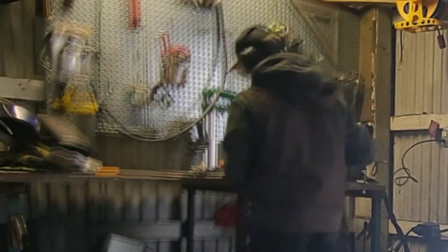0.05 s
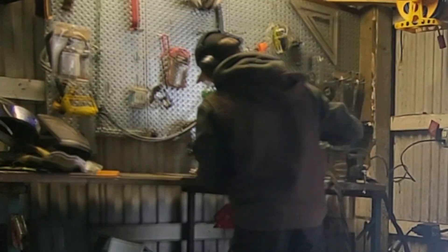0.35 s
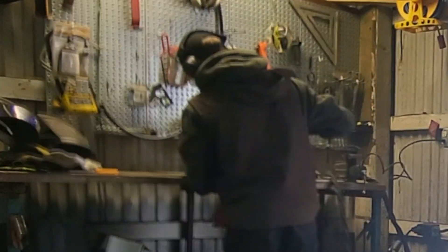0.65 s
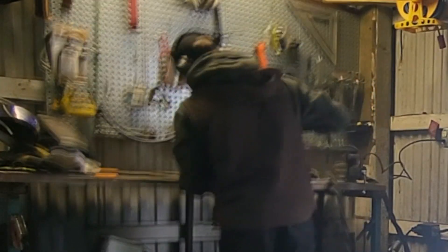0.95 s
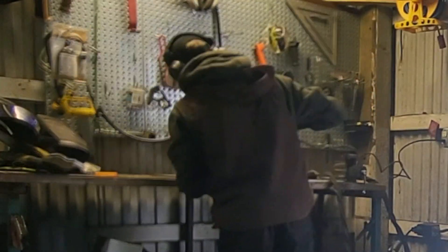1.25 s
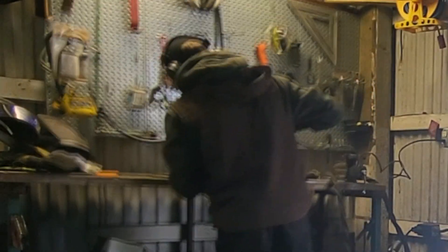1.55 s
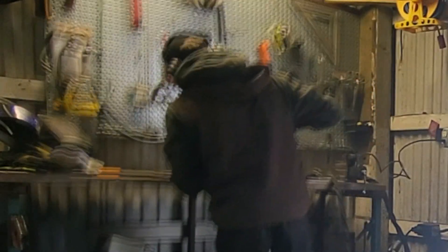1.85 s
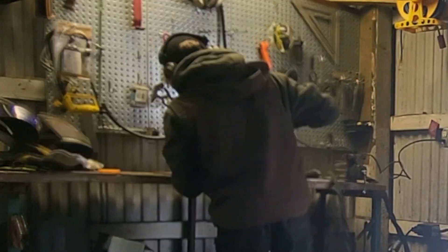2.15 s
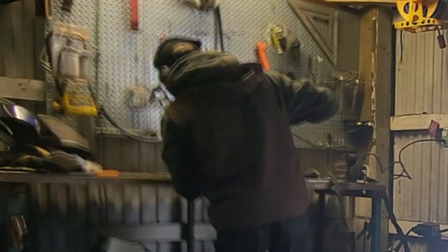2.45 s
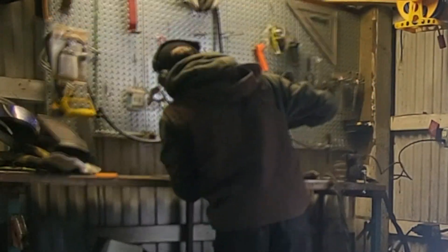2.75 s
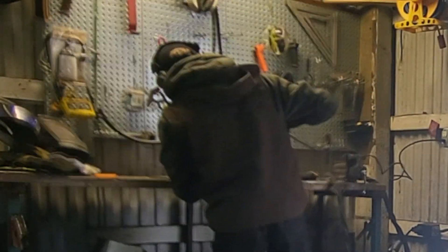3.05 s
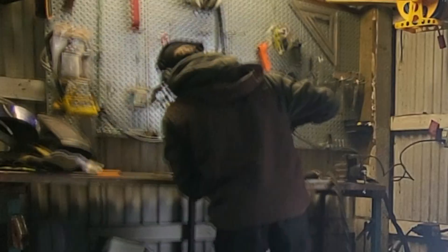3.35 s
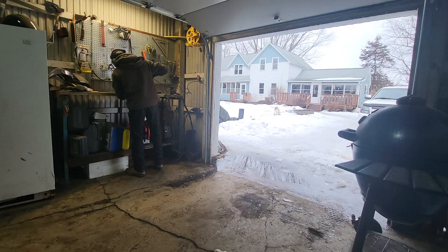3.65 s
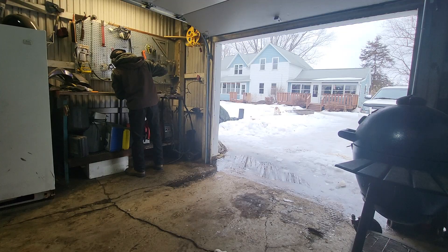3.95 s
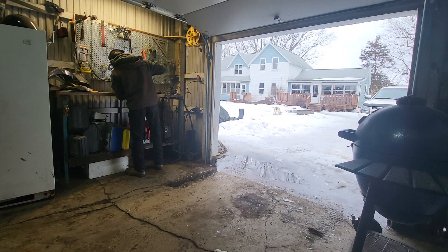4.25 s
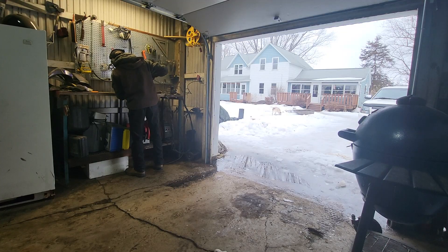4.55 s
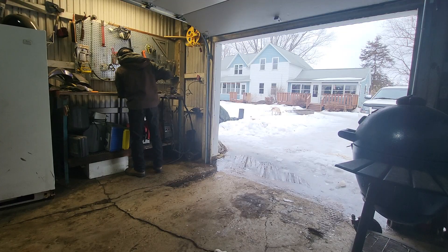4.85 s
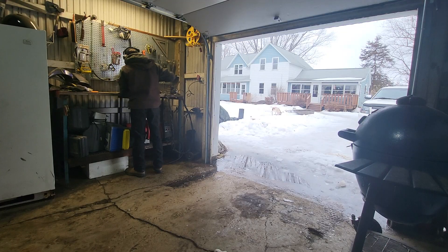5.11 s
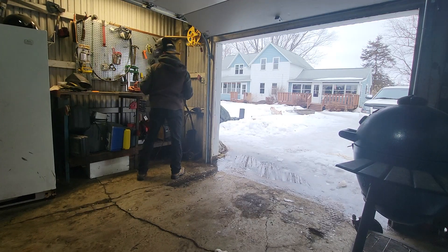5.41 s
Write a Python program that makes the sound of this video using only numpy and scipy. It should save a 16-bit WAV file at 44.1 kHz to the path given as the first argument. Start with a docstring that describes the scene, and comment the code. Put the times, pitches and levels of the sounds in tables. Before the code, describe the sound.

An electric angle grinder runs close by in a garage, its high whine riding on a strong hiss. The disc is pressed into steel in several short passes, each adding a gritty, ringing scrape, and on the harder ones the pitch sags and the disc squeals. Past the middle the grinder is heard from farther off, still working. It cuts off abruptly near the end, leaving very faint room noise.

```python
"""An electric angle grinder works on steel in a garage: its fan blades chop the air into a whine,
over a hiss of air and grit and the hum of unbalanced rotating parts. Under load the motor slows,
abrasion excites the modes of the steel, and the disc chatters into a squeal.
Part-way through it is heard from farther off; then it breaks off at once, leaving the quiet garage
and a faint scuff. Two soft low bumps lie underneath."""
import sys
import numpy as np
from scipy import signal
from scipy.fft import rfft, irfft, next_fast_len
from scipy.io import wavfile
from scipy.ndimage import map_coordinates

SR = 44100
rng = np.random.default_rng(int(sys.argv[2]) if len(sys.argv) > 2 else 0)


def int16_out(signal):
    """Quantize to a 16-bit WAV file."""
    q = np.round(np.clip(np.atleast_2d(signal).T, -1, 1) * 32767)
    wavfile.write(sys.argv[1], SR, q.astype(np.int16))


N = 245979
FAN_BLADES, GEAR = 12, 12 / 37  # GEAR: disc turns per rotor turn


def amp(db):
    """Amplitude ratio of a level in decibels."""
    return 10 ** (np.asarray(db) / 20)


def unit(x):
    """Normalisation to rms 1."""
    return x / np.sqrt(np.mean(x ** 2) + 1e-20)


def along(points, hz):
    """Interpolation of (frequency, value) points on a logarithmic frequency axis."""
    f, v = np.transpose(points)
    return np.interp(np.log(hz + 1), np.log(f + 1), v)


def curve(points):
    """Linear interpolation of (time, value) points at every sample."""
    return np.interp(np.arange(N) / SR, *np.transpose(points))


def wobble(rate):
    """Slow random modulation: a spline through rate Gaussian values a second."""
    knots = rng.standard_normal(int(N * rate / SR) + 4)
    return map_coordinates(knots, [np.arange(N) * rate / SR])


def swell(centre, length):
    """Half-cosine envelope."""
    return np.cos(np.pi * np.clip((np.arange(N) / SR - centre) / length, -.5, .5))


def strokes(rows, attack_s, release_s):
    """Sum of trapezoidal envelopes, one per (start, duration, level) row."""
    t = np.arange(N) / SR
    return sum(amp(db) * np.clip((t - s) / attack_s, 0, 1) * np.clip((s + length - t) / release_s, 0, 1)
               for s, length, db in rows)


def filtered(x, response):
    """Linear filtering: the spectrum is multiplied by a frequency response."""
    size = next_fast_len(N + SR // 2)
    return irfft(rfft(x, size) * response(np.fft.rfftfreq(size, 1 / SR)), size)[..., :N]


def coloured(x, spectrum):
    """Spectral shaping by (frequency, level) points, at rms 1."""
    return unit(filtered(x, lambda hz: amp(along(spectrum, hz))))


def ringing(x, modes):
    """Modal superposition at rms 1; each mode is two identical resonators in series."""
    def resonator(f, centre, width):
        return 1j * f * width / (centre ** 2 - f ** 2 + 1j * f * width)
    return unit(filtered(x, lambda f: sum(amp(db) * resonator(f, hz, bw) ** 2 for hz, bw, db in modes)))


def tone(cycles, rough, flutter):
    """Line broadening at rms 1: a share of the power, rough, fluctuates flutter times a second."""
    scatter = (wobble(flutter) + 1j * wobble(flutter)) * np.sqrt(rough / 2)
    carrier = np.exp(2j * np.pi * (cycles + rng.random()))
    return unit(np.real((np.sqrt(1 - rough) + scatter) * carrier))


def grit(spiky_db):
    """Countless tiny impacts merge into noise with a log-normal envelope."""
    return rng.standard_normal(N) * amp(spiky_db * wobble(1800))


def ambience():
    """The noise floor of the quiet garage: stationary noise, strongest at low frequencies."""
    # background spectrum: (frequency [Hz], relative level [dB])
    spectrum = [(30, -12.5), (130, -6), (190, 0.5), (320, -7.5), (850, -2), (1300, -1), (1800, -12),
                (4000, -19.5), (15000, -33)]
    return amp(-75.5) * coloured(rng.standard_normal(N), spectrum)


def bumps():
    """Dull bumps: low-frequency noise under smooth envelopes."""
    # bumps: (centre time [s], duration [s], level [dB])
    events = [(3.43, 0.18, -67), (5.2, 0.39, -73)]
    # their spectrum: (frequency [Hz], relative level [dB])
    spectrum = [(30, -20), (65, -6), (110, -23), (190, 1), (350, -25), (1000, -70)]
    envelope = sum(amp(db) * swell(s, length) for s, length, db in events)
    return envelope * coloured(rng.standard_normal(N), spectrum)


def scuff(start, db, t60):
    """Friction noise with exponential decay: something brushes lightly against the bench."""
    # friction spectrum: (frequency [Hz], relative level [dB])
    spectrum = [(500, -18.5), (3000, -2), (5000, 6), (10000, -7.5), (14000, -18)]
    age = np.maximum(np.arange(N) / SR - start, 0)
    attack = 1 - np.exp(-age / 0.0034)
    return amp(db - 60 * age / t60) * attack * coloured(rng.standard_normal(N), spectrum)


def garage(x, wet_db, count=6):
    """Reverberation: direct sound plus reflections, which shift as the tool moves."""
    # decay of the room: (frequency [Hz], reverberation time [s])
    t60 = [(200, 0.28), (3000, 0.45), (12000, 0.42)]
    hz, t, noise = signal.stft(rng.standard_normal((count, SR // 2)), SR, nperseg=256)
    tails = signal.istft(noise * amp(-60 * t / along(t60, hz)[:, None]), SR, nperseg=256)[1]
    echoes = signal.fftconvolve(x[None], tails / np.linalg.norm(tails[0]), axes=1)[:, :N]
    shares = np.clip(1 - abs(np.linspace(0, count - 1, N) - np.arange(count)[:, None]), 0, 1)
    echo = np.sum(np.sqrt(shares) * echoes, axis=0)  # equal-power crossfade from tail to tail
    return (x + amp(wet_db) * echo) / np.sqrt(1 + amp(wet_db) ** 2)


def unbalance_hum(turns, speed):
    """Forced vibration: unbalanced rotor and disc hum at harmonics of their rotation rates."""
    # rotor harmonics: (multiple of rotor speed [1], relative level [dB])
    rotor_lines = [(1, -0.5), (2, -6.5), (3, -10), (4, -7.5)]
    # disc harmonics: (multiple of disc speed [1], level near mean speed [dB])
    disc_lines = [(1, -75), (2, -80), (3, -65.5), (5, -72.5), (6, -69.5), (8, -67.5)]
    # resonance that lifts the rotor's fundamental: (speed [rev/s], width [rev/s], gain [dB])
    shake = (406, 9.8, 6.5)
    centre, width, peak_db = shake
    resonance_db = peak_db * np.exp(-.5 * ((speed - centre) / width) ** 2)
    rotor = sum(amp(-63 + db + resonance_db * (k == 1)) * tone(k * turns, rough=.04 * k, flutter=18)
                for k, db in rotor_lines)
    disc = sum(amp(db) * tone(k * GEAR * turns, rough=.15, flutter=7.4) for k, db in disc_lines)
    return rotor + (speed / speed.mean()) ** 4 * disc


def air_hiss(turns, sag):
    """Flow noise: air and grit rush past the resonant housing, louder at speed."""
    # flow spectrum: (frequency [Hz], relative level [dB])
    spectrum = [(30, -43.5), (70, -28), (110, -29.5), (190, -26), (290, -19), (600, -16), (1000, -11.5),
                (1500, -10.5), (2050, -7), (2600, -1), (5400, 1.5), (6800, -4.5), (8700, -9), (10500, -11),
                (12000, -19), (14000, -23.5), (15700, -26)]
    # modes of housing and vents: (frequency [Hz], width [Hz], relative level [dB])
    housing = [(426, 148, -3), (1063, 110, 0), (1168, 220, 3.5), (1723, 61, 4.5), (2876, 230, 8.5),
               (3728, 79, 8.5), (4960, 690, 2), (7770, 440, -2.5)]
    pulse = 1 + 0.037 * np.cos(2 * np.pi * GEAR * turns)
    rush = coloured(grit(spiky_db=1), spectrum) + amp(-14) * ringing(grit(spiky_db=0), housing)
    return amp(-33.5 - 1.7 * sag + 0.39 * wobble(28.04)) * pulse * rush


def fan_whine(turns, sag, bite):
    """Blade-passing tone and two overtones: a thin whistle running free, a rasp under load."""
    # the fundamental as the tool is turned about: (time [s], relative level [dB])
    whine_levels = [(0, -40.5), (.3, -44), (.8, -36.5), (1.15, -43), (1.52, -36.5), (1.9, -39),
                    (3.05, -38.5), (3.25, -39.5), (4.75, -42.5), (5.2, -38)]
    # its octave: (time [s], level [dB])
    octave_levels = [(0, -48.5), (.9, -52), (1.25, -62), (1.65, -54), (2.05, -43.5), (2.3, -49), (3.1, -50),
                     (3.3, -46.5), (5, -50.5)]
    whine_db, octave_db = curve(whine_levels), curve(octave_levels)
    rasp = np.clip(.04 + 0.6 * sag + .55 * bite / bite.max(), 0, 1)
    blades = FAN_BLADES * turns + 0.066 * rasp * wobble(240)  # the bouncing disc shakes the rotor
    whine = amp(whine_db + 2 - 9.4 * rasp) * tone(blades, rough=0.55, flutter=65)
    whine += amp(whine_db - 8 + 7.5 * rasp) * tone(blades, rough=1, flutter=400)  # spread by turbulence
    whine *= 1 + .18 * np.cos(2 * np.pi * GEAR * turns)  # one throb per turn of the disc
    whine += amp(octave_db) * tone(2 * blades, rough=0.78, flutter=160)
    whine += amp(octave_db - 16.5) * tone(3 * blades, rough=.85, flutter=240)
    return whine


def disc_squeal(turns):
    """Friction-excited vibration: the pressed disc chatters, or catches and sets one steel mode singing."""
    # spells of chatter: (start time [s], duration [s], level [dB])
    spells = [(1.83, 0.55, -40), (2.61, 0.407, -40), (3.75, .34, -42.5), (4.1, 0.22, -49)]
    # chatter harmonics: (multiple of disc speed [1], relative level [dB])
    lines = [(6, -23), (7, -21), (8, -19.5), (18, 0.5), (20, -9), (22, -15), (26, -11), (36, -14),
             (54, -14)]
    # singing modes: (centre time [s], duration [s], frequency [Hz], level [dB])
    catches = [(2.92, .1, 7340, -42), (3.2, 0.56, 8050, -48), (3.92, .12, 8060, -44),
               (4.2, 0.38, 1003, -57), (4.327, 0.06, 4600, -31.5), (4.33, .05, 2300, -44),
               (4.52, .09, 7970, -48)]
    t = np.arange(N) / SR
    chatter = sum(amp(db) * tone(k * GEAR * turns, rough=0.19, flutter=70) for k, db in lines)
    singing = sum(amp(db) * swell(s, length) * tone(hz * t, rough=0.96, flutter=hz / 45)
                  for s, length, hz, db in catches)
    return strokes(spells, attack_s=0.11, release_s=0.1) * chatter + singing


def grinding(turns, bite):
    """Impact excitation: abrasive grains ring the steel's modes and fling off a fizz of grit."""
    # modes of the steel: (frequency [Hz], width [Hz], relative level [dB])
    steel = [(1040, 120, -13.5), (2340, 280, -1.5), (2760, 300, 3.5), (3550, 490, 2.5), (4810, 450, 2),
             (5380, 620, 4.5), (6260, 460, -1.5), (7300, 180, 5), (8220, 380, -7.5), (10500, 800, -26),
             (12420, 300, -8.5), (14170, 250, -17)]
    # spectrum of the flying grit: (frequency [Hz], relative level [dB])
    fizz = [(500, -24), (2500, -8), (6000, 3), (10000, 2), (13500, -12.5), (15700, -16)]
    rake = 1 + 0.22 * np.cos(2 * np.pi * GEAR * turns)  # the disc's high spot strikes once a turn
    contact = bite * amp(0.89 * wobble(35))
    ring = amp(-3) * contact * ringing(rake * grit(spiky_db=3.5), steel)
    graze = amp(-38.5) * swell(centre=0.97, length=0.093)
    spray = (amp(-8.5) * contact + graze) * coloured(rake * grit(spiky_db=4), fizz)
    return ring + spray


def scene():
    """Superposition of grinder and background; the grinder is near, then farther off, then silent."""
    # motor speed, sagging under load: (time [s], speed [rev/s])
    speeds = [(0.0, 400.7), (0.28, 427.5), (0.64, 445.5), (0.9, 452.1), (1.34, 443.5), (1.63, 451.3),
              (2.0, 430.2), (2.23, 409.1), (2.52, 421.5), (2.69, 415.0), (2.96, 392.5), (3.19, 404.9),
              (3.8, 423.0), (4.06, 392.4), (4.25, 381.6), (4.6, 424.7), (5.03, 449.8), (5.35, 433.2)]
    # the disc is pressed into the steel: (start time [s], duration [s], relative level [dB])
    passes = [(0.55, 0.47, -47), (1.05, 0.51, -45.5), (1.72, 0.57, -35.5), (2.24, 0.28, -43),
              (2.6, .43, -34), (3.76, 0.36, -34), (4.08, 0.32, -38), (4.95, .5, -41.5)]
    free_hz, labouring_hz = 453, 382
    far_s, end_s = 3.484, 5.35
    t = np.arange(N) / SR
    speed = curve(speeds)
    sag = (free_hz - speed) / (free_hz - labouring_hz)  # 0 running free, 1 labouring
    turns = np.cumsum(speed * (1 + 0.000776 * wobble(30))) / SR
    bite = strokes(passes, attack_s=0.11, release_s=0.11)
    scrape = grinding(turns, bite)
    squeal = disc_squeal(turns)
    noise = garage(air_hiss(turns, sag) + scrape, wet_db=-5)
    tones = garage(fan_whine(turns, sag, bite) + squeal, wet_db=-7.5)
    grinder = noise + tones + unbalance_hum(turns, speed)
    distance_gain = np.where(t < far_s, 1, amp(-6))
    background = ambience() + bumps() + scuff(start=5.431, db=-75, t60=0.158)
    mono = grinder * distance_gain * (t < end_s) + background
    return np.array([mono, mono])


def record(dry):
    """Band limiting by an ideal low-pass filter."""
    return filtered(dry, lambda hz: hz < 15750)


dry = scene()
out = record(dry)
int16_out(out)
```